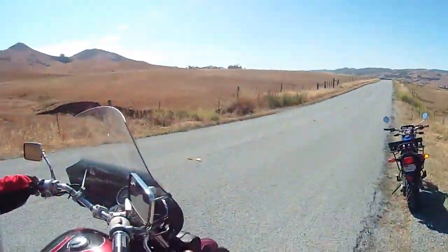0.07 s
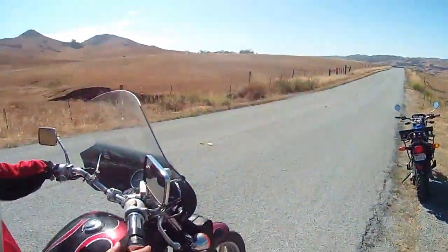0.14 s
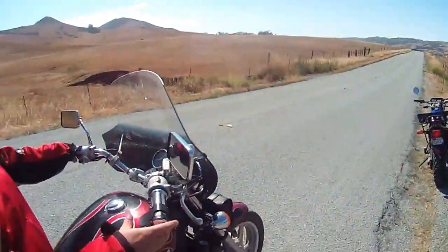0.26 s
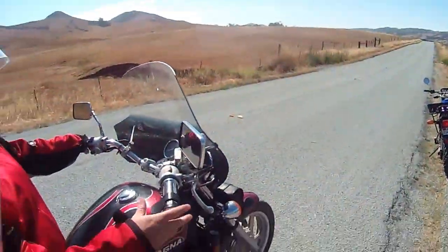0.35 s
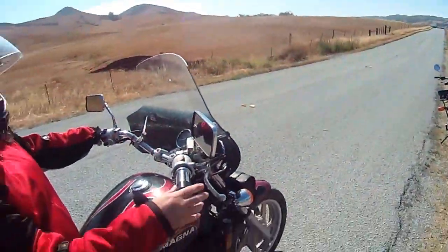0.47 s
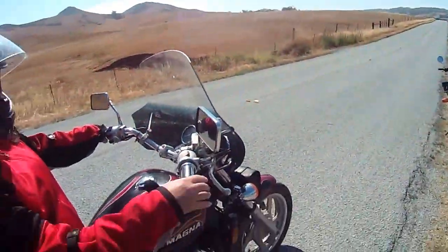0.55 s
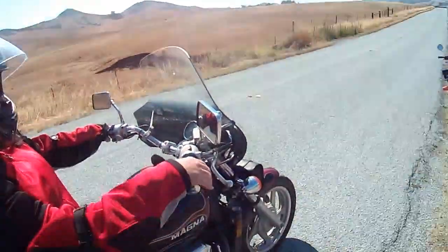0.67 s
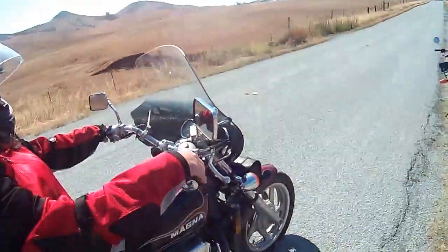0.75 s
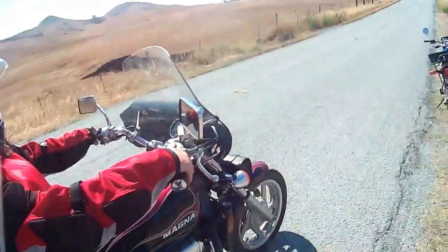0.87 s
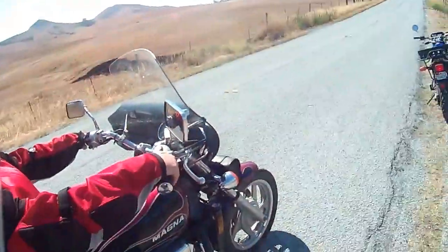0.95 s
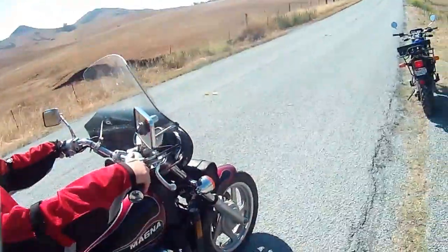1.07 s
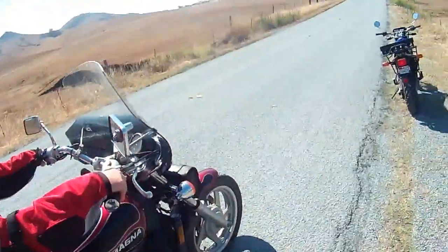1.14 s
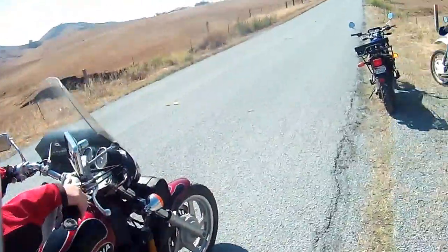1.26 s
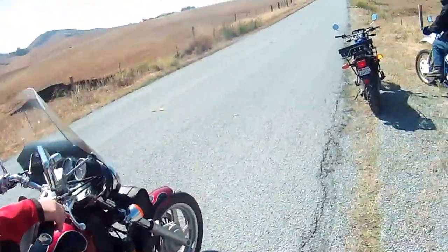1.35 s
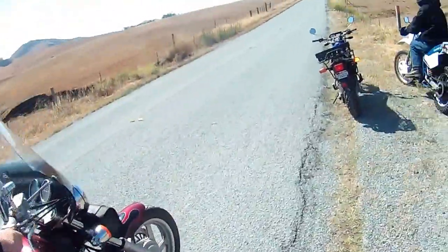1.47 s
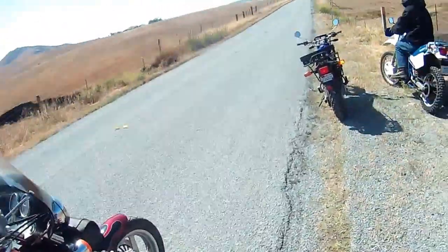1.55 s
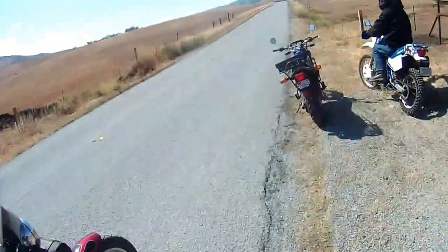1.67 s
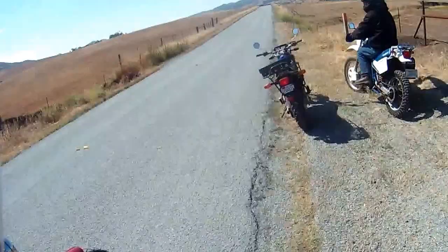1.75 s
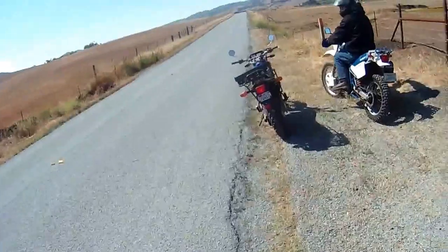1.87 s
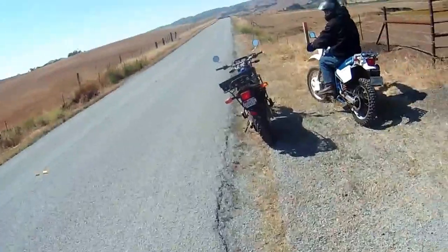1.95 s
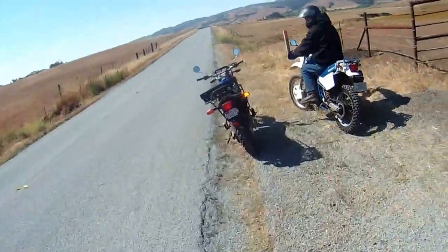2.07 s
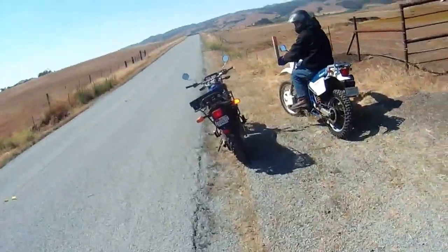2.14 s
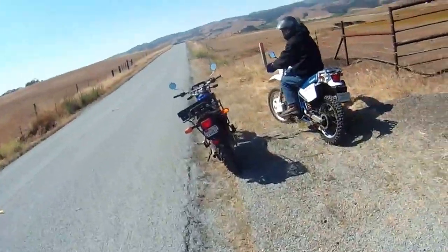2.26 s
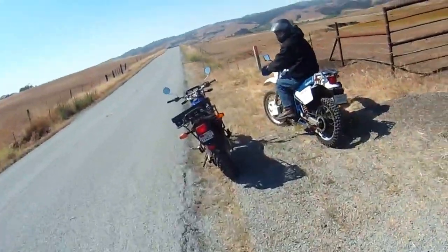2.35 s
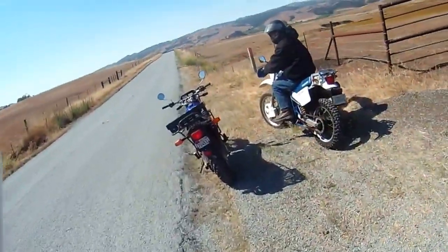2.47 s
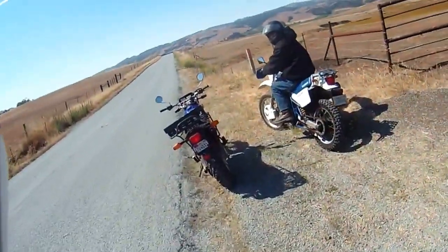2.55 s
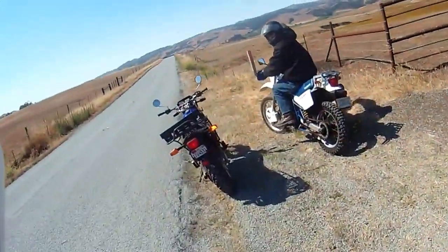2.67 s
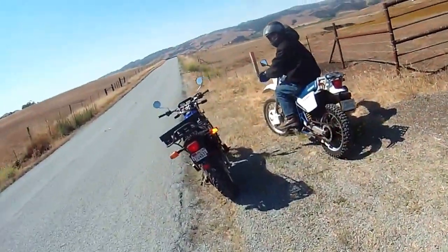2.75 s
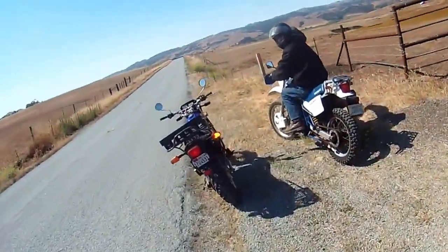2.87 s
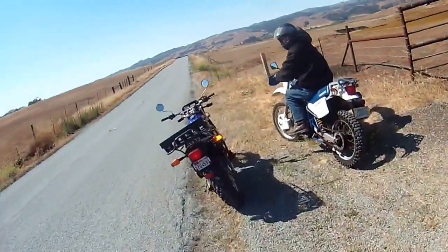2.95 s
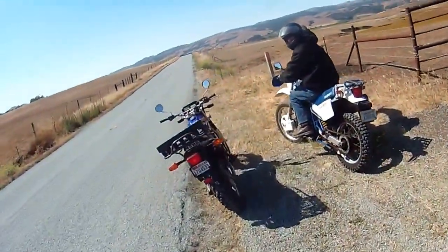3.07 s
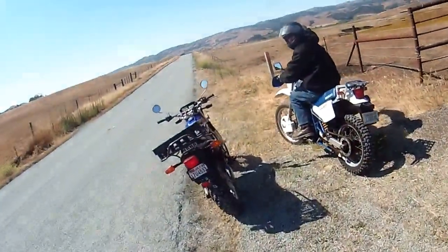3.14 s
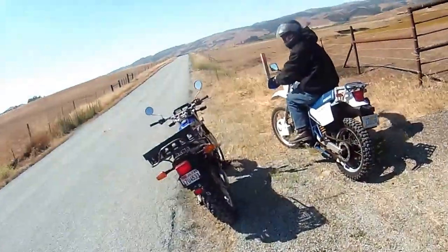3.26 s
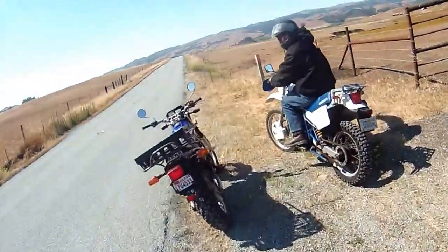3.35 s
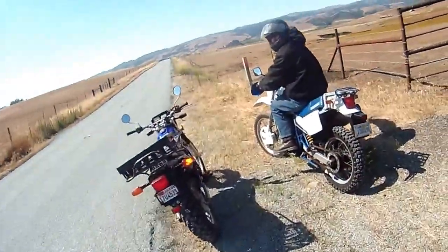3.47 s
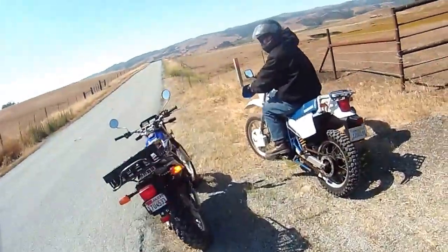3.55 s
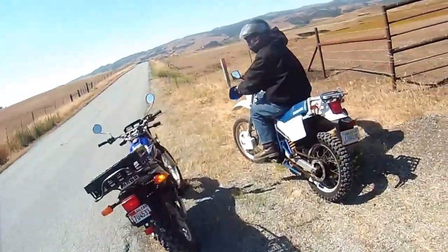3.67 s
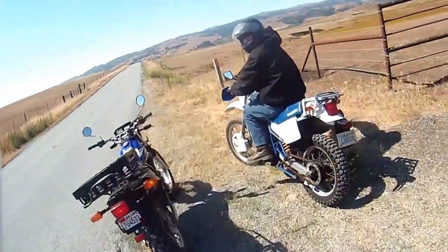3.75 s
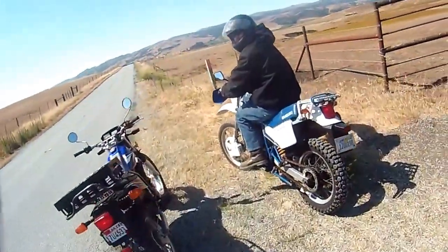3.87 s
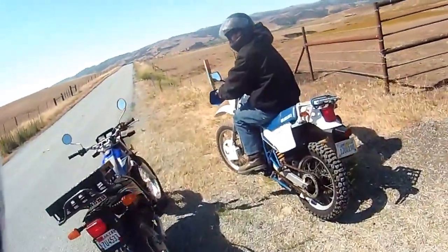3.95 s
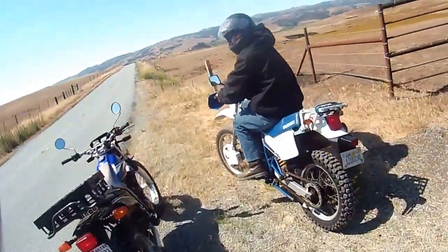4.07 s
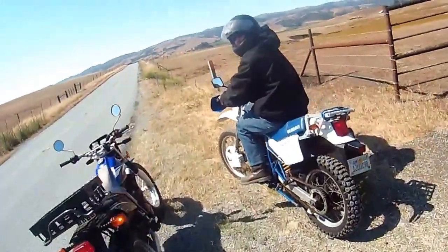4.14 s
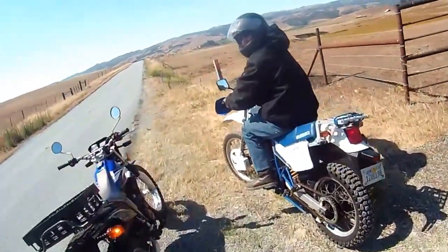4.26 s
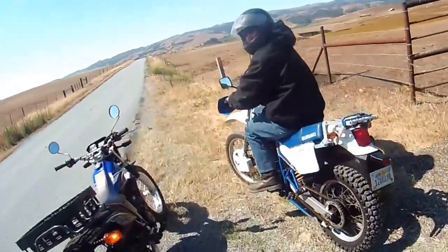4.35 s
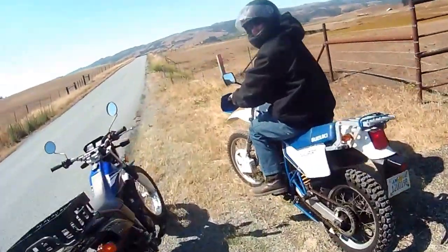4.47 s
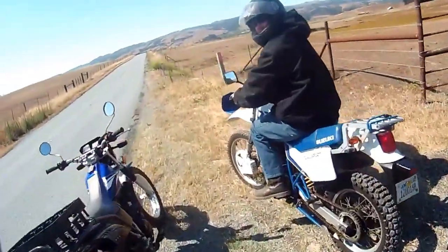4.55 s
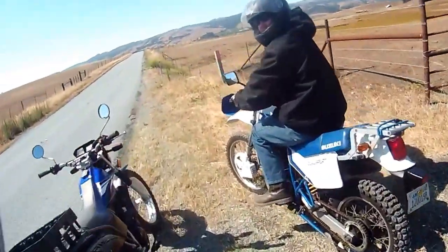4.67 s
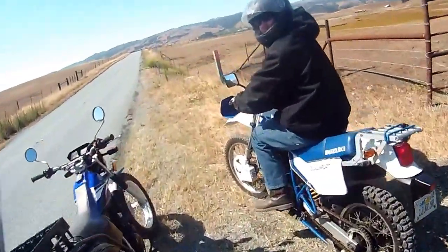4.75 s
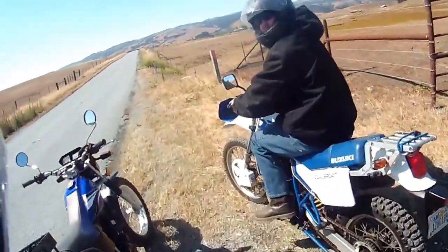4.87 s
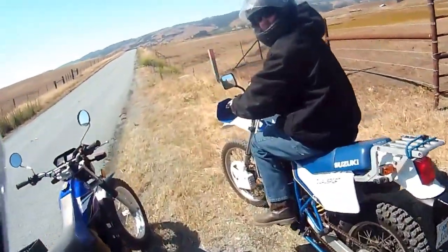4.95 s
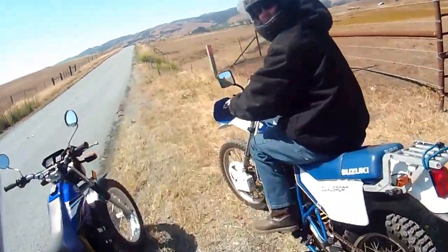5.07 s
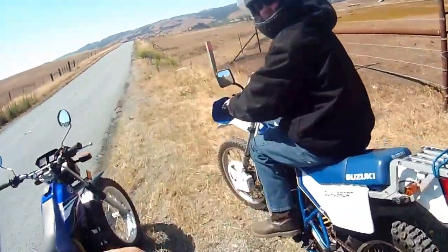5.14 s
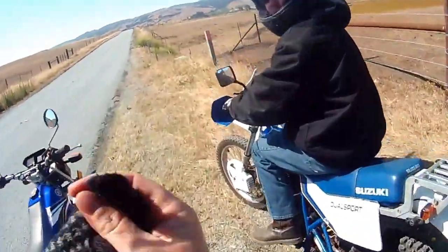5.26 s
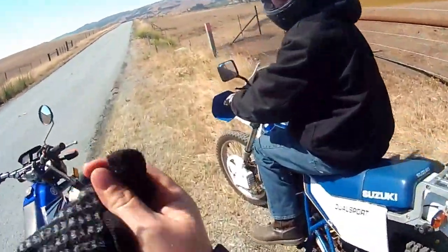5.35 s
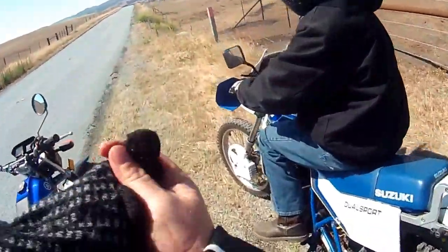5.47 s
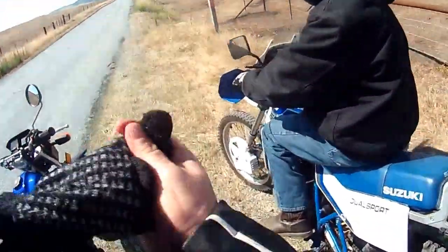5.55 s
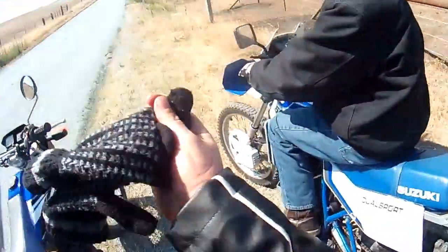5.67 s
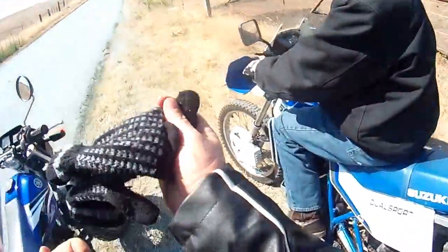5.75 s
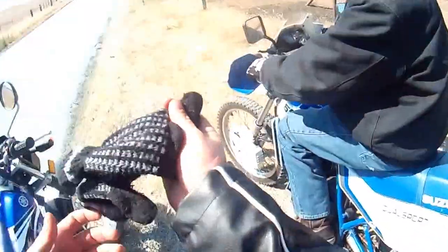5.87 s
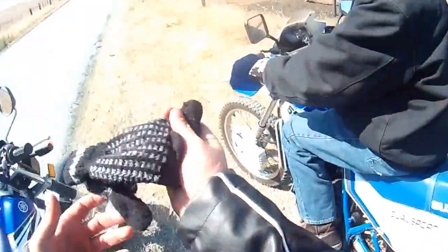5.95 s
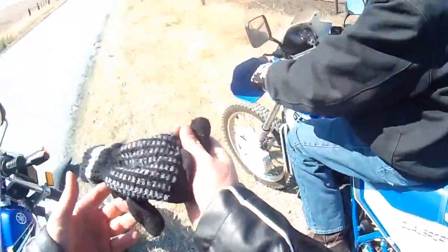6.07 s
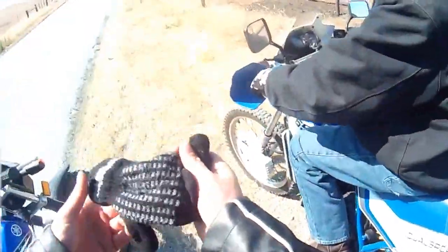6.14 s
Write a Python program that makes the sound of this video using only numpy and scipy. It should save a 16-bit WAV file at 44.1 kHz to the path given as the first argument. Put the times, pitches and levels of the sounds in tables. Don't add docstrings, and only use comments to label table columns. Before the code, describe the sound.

Outdoors on a country roadside, heard from a cased microphone on a helmet. A nearby motorcycle blips its throttle, whines at the peak, then drops and fades within a second and a half. The wearer walks on with low thumps toward two idling bikes: sharp regular valve ticks with soft muffler puffs, and a slower clatter with hisses. A strap buckle rattles once midway, and loose covers knock near the end.

```python
import sys
import numpy as np
from scipy import signal
from scipy.io import wavfile
from scipy.ndimage import uniform_filter1d

SR = 44100
rng = np.random.default_rng(int(sys.argv[2]) if len(sys.argv) > 2 else 0)


def gain_from_decibels(decibels):
    exponent = np.asarray(decibels, float) / 20
    return 10 ** exponent


def digitize_waveform(pressure):
    field = np.atleast_2d(pressure).T
    bounded = np.clip(field, -1, 1)
    quanta = np.round(bounded * 32767).astype(np.int16)
    wavfile.write(sys.argv[1], SR, quanta)


N = 273508
TIME_S = np.arange(N) / SR

# (time [s], firings so far [count])
FIRINGS = [(1.4502, 0), (2.7517, 23), (3.4272, 35), (3.5359, 37), (3.8737, 43), (3.9844, 45), (4.73, 59),
           (4.951, 63), (5.4835, 73), (5.7035, 77), (6.185, 86)]


def evened(x):
    return x / np.sqrt(np.mean(x ** 2) + 1e-20)


def read(points, hz):
    f, value = np.transpose(points)
    return np.interp(np.log(hz + 1), np.log(f + 1), value)


def follow(rows):
    s, *columns = np.transpose(rows)
    return [np.interp(TIME_S, s, column) for column in columns]


def colour(x, points):
    gain_db = read(points, abs(np.fft.fftfreq(4096, 1 / SR)))
    log_gain = np.log(gain_from_decibels(np.maximum(gain_db, -100)))
    response = np.fft.ifft(np.exp(np.conj(signal.hilbert(log_gain)))).real
    return signal.oaconvolve(x, response)[:len(x)]


def resonate(x, hz, width):
    pole = np.exp((-np.pi * width + 2j * np.pi * hz) / SR)
    return 2 * signal.lfilter([1 - abs(pole)], [1, -pole], x).real


def treble(x, above_hz):
    return signal.sosfilt(signal.butter(2, above_hz, "high", fs=SR, output="sos"), x)


def brighten(x, db, above_hz=2400):
    return x + (gain_from_decibels(db) - 1) * treble(x, above_hz)


def drift(per_s):
    knots = rng.standard_normal(int(N / SR * per_s) + 2)
    return evened(np.interp(TIME_S * per_s, np.arange(len(knots)), knots))


def add(mix, s, sound):
    part = mix[round(s * SR):][:len(sound)]
    part += sound[:len(part)]


def passing(closest_s, aside_s, closest_db, per_doubling_db):
    distance = np.hypot(1, (TIME_S - closest_s) / aside_s)
    return closest_db - per_doubling_db * np.log2(distance)


def patchy(x, broad_db, fine_db):
    z = signal.stft(x, nperseg=2048)[2]
    broad, fine = rng.standard_normal((2,) + z.shape)
    broad = evened(uniform_filter1d(uniform_filter1d(broad, 25, 0), 24, 1))
    fine = evened(uniform_filter1d(uniform_filter1d(fine, 2, 0), 10, 1))
    more_when_high = np.linspace(.3, 2.5, len(z))[:, None]
    gain = gain_from_decibels(broad_db * more_when_high * broad + fine_db * fine)
    return evened(signal.istft(z * gain, nperseg=2048)[1][:N])


def clatter(spread_db, broad_db):
    return patchy(rng.standard_normal(N), broad_db, fine_db=2.5) * gain_from_decibels(spread_db * drift(700))


def firing_pulses(count, uneven_db, gas):
    at = np.flatnonzero(np.diff(np.floor(count)) > 0)
    drive = np.zeros(N)
    drive[at] = gain_from_decibels(uneven_db * rng.standard_normal(len(at)))
    return evened(drive) + gas * rng.standard_normal(N) * np.exp(-(count % 1) / 0.61)


def burst(length_s):
    t = np.arange(1500) / SR
    return rng.standard_normal(len(t)) * np.minimum(t / 0.0017, 1) * np.exp(-t / length_s)


def exhaust_orders(hz, turns, octaves, throttle):
    # (order, full speed and shut throttle [dB], gained open [dB], lost per octave slower [dB])
    low_orders = [(2, -56, 0.5, 18), (3, -54, -26, 9), (4, -59, 1.5, 4), (5, -69, 9, -2)]
    # (order, level against the 5th [dB])
    upper_orders = [(6, -3.5), (7, -6), (8, -15)]
    # (centre [Hz], half width [Hz], lift [dB])
    pipe_boom = (196, 43, 8.4)
    boom_hz, half_hz, boom_db = pipe_boom
    lumpy_db = 0.6 - 1.5 * octaves
    orders_db = [db + open_db * throttle + fall_db * octaves + lumpy_db * drift(13.5)
                 for _, db, open_db, fall_db in low_orders]
    fifth_db = orders_db[-1]
    out = np.zeros(N)
    for k, db in enumerate(orders_db):
        out += gain_from_decibels(db) * np.cos(2 * np.pi * ((k + 2) * turns + 0.181 * k ** 2))
    crossing_db = boom_db - 20 * ((5 * hz - boom_hz) / half_hz) ** 2
    out += gain_from_decibels(fifth_db + crossing_db) * (1 - throttle) * np.cos(2 * np.pi * 5 * turns)
    for k, db in upper_orders:
        lift_db = boom_db * np.exp(-((k * hz - boom_hz) / half_hz) ** 2) - 7.0
        order_db = fifth_db + db + lumpy_db * drift(14.0) + (1.5 - throttle) * lift_db
        out += gain_from_decibels(order_db) * np.cos(2 * np.pi * k * turns)
    return out


def gear_whine(hz, turns, throttle):
    # (order, level [dB])
    whine_orders = [(12, -20), (14, -19), (16, -22), (19, -27), (28.5, -6), (37.9, 5), (43, 3), (50, -8)]
    steep_db_per_hz = 3 + (5.5 - 3) * throttle
    whine_db = -55.5 + steep_db_per_hz * np.minimum(hz - 42.6, 0)
    out = np.zeros(N)
    for k, db in whine_orders:
        unloaded_db = 10.0 * (k < 20) * np.clip((TIME_S - .33) / .05, 0, 1)
        out += gain_from_decibels(whine_db + db + 1.6 * drift(44.4) - unloaded_db) * np.cos(2 * np.pi * k * turns)
    return out


def pipe_gas(octaves, throttle, throb_db):
    # (frequency [Hz], density [dB per Hz])
    gas_tone = [(40, -20), (120, 0.5), (200, -1), (370, -9.5), (480, -15), (800, -33)]
    # (pitch [Hz], width [Hz], level [dB], fading time [s])
    frame_hum = (754, 17, -78, 0.34)
    hum_hz, hum_width_hz, hum_db, hum_s = frame_hum
    rush = gain_from_decibels(-69 + throb_db) * evened(colour(rng.standard_normal(N), gas_tone))
    note = gain_from_decibels(-67.5 + 2.0 * octaves - 16 * throttle) * evened(resonate(rng.standard_normal(N), 196, 25))
    hum_level = gain_from_decibels(hum_db - 20 * (TIME_S / hum_s) ** 4 / 3)
    return rush + note + hum_level * evened(resonate(rng.standard_normal(N), hum_hz, hum_width_hz))


def engine_clatter(octaves, throttle, throb_db):
    # (frequency [Hz], density [dB per Hz])
    near_tone = [(260, -57.5), (450, -41.5), (499, -29), (814, -25.5), (1270, -2.5), (1470, -1.5),
                 (1660, 4.5), (2620, -9.5), (3040, -9), (3970, -19.5), (4340, -19), (5840, -24.5),
                 (6580, -21.5), (7630, -28.5), (9500, -29.5), (11000, -36.5), (15500, -38.5)]
    lag_s, leaving_s, leaving_db_per_s = 0.035, 1.39, 9
    level_db = -42 + 9.5 * np.interp(TIME_S - lag_s, TIME_S, octaves) + 0.5 * throttle
    level_db += 1.0 * np.exp(-((TIME_S - .34) / .13) ** 2)
    level_db -= leaving_db_per_s * np.clip(TIME_S - leaving_s, 0, 3)
    bright_db = 4.5 - 2.5 * np.minimum(TIME_S, 1.4)
    knocks = clatter(spread_db=0.3, broad_db=0.0) * gain_from_decibels(throb_db)
    return gain_from_decibels(level_db) * brighten(evened(colour(knocks, near_tone)), bright_db)


def blipped_engine():
    # (time [s], firing rate [Hz])
    blip_curve = [
        (0, 36.4),
        (.1, 39.2),
        (.2, 43),
        (.3, 45.5),
        (.46, 42),
        (.7, 35),
        (.95, 27.5),
        (1.2, 21.3),
        (1.45, 17),
    ]
    full_speed_hz, throttle_shut_s, shutting_s = 45, 0.3, 0.039
    hz = follow(blip_curve)[0]
    turns = np.cumsum(hz) / SR
    octaves = np.log2(hz / full_speed_hz)
    throttle = np.clip((throttle_shut_s - TIME_S) / shutting_s + .5, 0, 1)
    alive = np.clip((1.35 - TIME_S) / 0.4, 0, 1)
    throb_db = 1.2 * np.cos(2 * np.pi * turns) + .7 * np.cos(2 * np.pi * (2 * turns + .3))
    tonal = exhaust_orders(hz, turns, octaves, throttle) + gear_whine(hz, turns, throttle)
    gas = pipe_gas(octaves, throttle, throb_db)
    return np.sqrt(2) * alive * (tonal + gas) + engine_clatter(octaves, throttle, throb_db)


def tick_rows():
    # (time [s], crack [dB], knock [dB], knock pitch [Hz])
    hard_ticks = [(1.451, -56, -38, 1650), (1.564, -44, -36.5, 1660), (1.6203, -63, -55, 1700),
                  (1.679, -46.5, -40, 1680), (1.7335, -46, -40.5, 1660), (1.789, -45, -40, 1670),
                  (1.8451, -47.5, -43.5, 1640), (1.956, -48, -55, 1900), (2.0708, -42, -61, 1850),
                  (2.127, -48.5, -64, 1700), (2.186, -48.5, -61, 1700), (2.2421, -49, -47, 1530),
                  (2.299, -45, -63, 1790), (2.357, -49, -52, 1680), (2.413, -45, -44, 2570),
                  (2.4687, -45, -45.5, 2500), (2.5256, -45.5, -62, 1650), (2.5835, -43.5, -50, 1740),
                  (2.6405, -45, -67, 1680), (2.694, -46.5, -54, 1710), (2.752, -43.5, -53, 1930),
                  (2.8068, -42, -46, 1890), (2.862, -43, -45, 1700), (2.976, -39, -47, 1600),
                  (3.034, -45, -61, 1690), (3.089, -39.5, -42, 1820), (3.1453, -40, -56, 1570),
                  (3.201, -41, -63, 1670), (3.533, -44.5, -45, 1720), (3.591, -49, -48, 1700),
                  (3.649, -45.5, -52, 1700), (3.759, -43.5, -52, 1680), (3.7034, -42.5, -38, 1470),
                  (3.8736, -44.5, -38.5, 1670), (3.9835, -40.5, -37, 1570), (4.0378, -42, -42, 1560),
                  (4.0895, -37.5, -63, 1640), (4.197, -39.5, -45, 1530), (4.304, -36, -46, 1770),
                  (4.357, -42.5, -43, 1700), (4.411, -38.5, -38, 1530), (4.464, -40, -38.5, 1770),
                  (4.5179, -40.5, -42.5, 1710), (4.623, -42, -46, 1730), (4.732, -55, -52, 1700),
                  (4.784, -55, -38, 1830), (4.8943, -44.5, -38.5, 1780), (5.002, -46, -40, 1740),
                  (5.115, -45, -42, 1700), (5.598, -58, -31, 1745)]
    hard_treble_db = [-11, -11, -11, -5, -7, -5, -6, -9, -11, -8, -8, -6, -12, -8, -6, -9, -8, -15, -11, -9,
                      -14, -9, -9, 1, -5, -6, -7, -9, 4, 0, 3, -1, 1, -4, 0, -1, 2, -1, -11, -3, -1, -1, 2,
                      0, -3, 9, 2, -3, -3, -3]
    ticking_count, shaded_s, shaded_db_per_s = 77, 4.6, 40
    s, count = np.transpose(FIRINGS)
    k = np.arange(ticking_count)
    crack_chance, knock_chance, pitch_chance = rng.standard_normal((3, ticking_count))
    at = np.interp(k, count, s)
    valve_db = passing(closest_s=-1, aside_s=-7, closest_db=-53, per_doubling_db=1.5)
    crack_db = valve_db[(at * SR).astype(int)] - shaded_db_per_s * np.maximum(at - shaded_s, 0)
    crack_db += 1.5 * crack_chance + 4.5 * (-1) ** k
    knock_db = crack_db - 12 + 4 * knock_chance
    knock_hz = 1680 * (1 + 0.1 * pitch_chance)
    rows = np.transpose([at, crack_db, knock_db, knock_hz, np.zeros(ticking_count)])
    for row, treble_db in zip(hard_ticks, hard_treble_db):
        rows[np.argmin(abs(at - row[0]))] = (*row, treble_db)
    return rows


def valve_ticks():
    # (frequency [Hz], level [dB])
    tick_tone = [(400, -67), (1000, -5), (1500, -5), (2200, -0.5), (2900, -1), (3600, -9), (4000, -6.5),
                 (4600, -14), (6000, -21), (9000, -19.5), (15000, -42)]
    # (pitch [Hz], decay [s], level against the crack [dB])
    tick_ring = (3100, 0.0039, -13.5)
    ring_hz, ring_s, ring_db = tick_ring
    out, t = np.zeros(N), np.arange(1500) / SR
    for s, crack_db, db, hz, treble_db in tick_rows():
        knock = np.exp(-((t - .0016) / 0.0013) ** 2) * np.cos(2 * np.pi * (hz * t + rng.random()))
        click = 2.8 * (np.arange(1500) == 30)
        crack = colour(click + burst(length_s=0.0015) + 0.2 * burst(length_s=0.012), tick_tone)
        crack = brighten(crack, treble_db, above_hz=4800)
        ring = np.exp(-t / ring_s) * np.sin(2 * np.pi * ring_hz * rng.uniform(0.71, 1.07) * t)
        tick = gain_from_decibels(crack_db + ring_db) * ring + gain_from_decibels(db - 2.5) * knock
        tick = tick + gain_from_decibels(crack_db - 10) * crack / np.std(crack[:130])
        echo = np.roll(tick, 400)
        add(out, s, tick + 0.46 * echo * rng.uniform(0.71, 0.79))
    return out


def muffler_puffs():
    # (pitch [Hz], width [Hz], level [dB])
    muffler_modes = [(69, 97, 0), (131.7, 12, -2.5), (190, 20, -21), (251.5, 42, 4), (337, 38, -16),
                     (503, 760, -18)]
    count = follow(FIRINGS)[0] + 0.042
    drive = firing_pulses(count, uneven_db=1.3, gas=0.42)
    drive = drive * gain_from_decibels(-0.8 * np.cos(np.pi * np.floor(count)))
    out = np.zeros(N)
    for k, (hz, width, db) in enumerate(muffler_modes):
        mode = resonate(resonate(drive, hz, 2.0 * width), hz, width)
        out += (-1) ** k * gain_from_decibels(db) * evened(mode)
    return gain_from_decibels(passing(closest_s=5.5, aside_s=1.31, closest_db=-59.5, per_doubling_db=13.5)) * evened(out)


def slow_pipe(strokes):
    beat = firing_pulses(strokes + .22 + .03 * drift(5), uneven_db=1.2, gas=.6)
    pipe = resonate(resonate(beat, 354, 66), 369.4, 14.8)
    pipe += 0.15 * resonate(resonate(beat, 464, 130), 485, 42)
    pipe += 0.1 * resonate(resonate(beat, 593, 120), 653, 55)
    return gain_from_decibels(passing(closest_s=5, aside_s=2.5, closest_db=-67, per_doubling_db=10)) * evened(pipe)


def slow_valve():
    # (time [s], peak level [dB])
    chuffs = [(2.2837, -64), (2.3464, -68), (2.5386, -65), (2.602, -63), (2.6644, -65), (2.7257, -66),
              (2.7901, -64), (2.8519, -63), (2.9138, -63), (3.0375, -62), (3.4057, -60), (3.4645, -61),
              (3.7898, -61), (3.916, -59), (4.1515, -58), (4.2253, -58), (4.2872, -57), (4.351, -62),
              (4.6094, -60), (4.6623, -63), (4.7267, -60), (4.8479, -61), (4.9881, -60), (5.0499, -62),
              (5.1114, -57), (5.1677, -54), (5.2345, -55), (5.3023, -56), (5.3567, -60), (5.4244, -61),
              (5.4874, -61), (5.5494, -59), (5.6144, -59), (5.6774, -60), (5.7394, -64), (5.802, -63),
              (5.8561, -63), (5.9194, -58), (5.9894, -65), (6.0494, -66), (6.1624, -60)]
    # (frequency [Hz], level [dB])
    chuff_tone = [(3000, -27), (4700, 4), (5900, -8), (7600, 3.5), (9000, -5), (11500, -5), (14000, -12),
                  (15500, -25)]
    # (time [s], peak level [dB], pitch [Hz])
    cover_knocks = [(4.6069, -46, 1670), (4.676, -42, 1740), (4.8683, -45, 1820), (4.9808, -37, 1690),
                    (5.0474, -35, 1610), (5.1593, -41, 1530), (5.1831, -49, 1540), (5.304, -34, 1880),
                    (5.4056, -43, 1670), (5.4655, -41, 1730), (5.5662, -41, 1850), (5.674, -38, 1850),
                    (5.6905, -39, 2000), (5.8, -54, 1740), (5.9367, -36.5, 1730), (5.9984, -43, 1770),
                    (6.1227, -42, 1670)]
    drive, out, t = np.zeros(N), np.zeros(N), np.arange(2000) / SR
    for s, db in chuffs:
        add(drive, s, gain_from_decibels(db + 2) * burst(length_s=0.0072))
    shape = np.minimum(t / 0.0012, 1) * np.exp(-t / 0.0073)
    for s, db, hz in cover_knocks:
        add(out, s, gain_from_decibels(db - 4) * shape * np.sin(2 * np.pi * (hz * t + rng.random())))
    return out + colour(drive, chuff_tone)


def ringing_covers():
    # (pitch [Hz], width [Hz], level [dB], time of its swell or dip [s], gained then,
    # dip if negative [dB])
    covers = [(1540, 6.7, -5.5, 5.2, -2), (1677, 10, -6, 5.04, 6), (1708, 10, -6, 5.57, 2),
              (1790, 14, -9, 5.6, 6), (1859, 13, -9.5, 5.3, 8), (1958, 15, -7, 5.5, 3.5),
              (2117, 24, -21, 5.6, -3), (2763, 18, -23, 4, -2), (2907, 24, -19.5, 3.9, 2.5),
              (3220, 9.4, -33, 3.2, 2.5),
              (5000, 43, -32, 2.2, 6), (8230, 84, -37, 2.6, 11), (10400, 180, -39, 2.5, 11),
              (6540, 90, -30, 1.7, 22), (2560, 88, -20.5, 2.9, 13), (4395, 92, -25.5, 3.75, 11),
              (5300, 51, -31.5, 5.35, 12), (8930, 81, -42, 5.3, -2), (1313, 28, -18, 5.5, -8),
              (11200, 150, -49, 5.1, 4)]
    shaking = rng.standard_normal(N)
    out = np.zeros(N)
    for hz, width, db, s, gain_db in covers:
        near_db = gain_db * np.exp(-((TIME_S - s) / 0.23) ** 2)
        out += gain_from_decibels(db + drift(6.2) + near_db) * evened(resonate(shaking, hz, width))
    song = np.cos(2 * np.pi * np.cumsum(1522 + 4 * drift(12)) / SR)
    song_db = -2.5 + 1.8 * drift(25) + 5.5 * np.exp(-((TIME_S - 5.23) / 0.11) ** 2)
    return out + gain_from_decibels(song_db) * np.clip((TIME_S - 5.13) / 0.046, 0, 1) * song


def idlers_clatter(strokes):
    # (time [s], clatter level [dB], treble gained as the head turns [dB])
    approach = [(1.4, -74, 8), (1.7, -68.5, 3), (2.1, -65.5, 5.5), (2.5, -64.5, -3.5), (3.2, -60, -1.5),
                (3.6, -59, 1), (4.1, -58, 1), (4.5, -56.5, 2), (4.8, -56.5, -0.5), (5.3, -57.5, 1.5),
                (5.7, -56, -0.5), (6.2, -57, 1.5)]
    # (frequency [Hz], density [dB per Hz])
    far_tone = [(260, -62), (450, -21.5), (633, -24), (790, -28.5), (1200, -11), (1470, -9), (1510, -4),
                (1730, -0.2), (1990, -7), (2060, -14.5), (2260, -10.5), (3090, -16.5), (3970, -31),
                (4680, -19.5), (5840, -35), (7630, -22), (12000, -45.5), (15500, -55)]
    # (pitch [Hz], width [Hz], level [dB], fading from [s], lost [dB per s])
    side_ring = (2971, 228, -7, 2.5, 9)
    close_db, facing_s = -56, 4.94
    level_db, bright_db = follow(approach)
    knocks = clatter(spread_db=2.5, broad_db=1.8) * gain_from_decibels(0.21 * drift(25))
    body = evened(colour(knocks, far_tone))
    top = treble(treble(body[::-1], 10500)[::-1], 10500)
    body = body - 0.71 * np.clip((TIME_S - facing_s) / 0.5, 0, 1) * top
    depth_db = 4.5 * np.exp(-((TIME_S - 5) / 0.84) ** 2)
    hiss_db = bright_db + depth_db * np.cos(2 * np.pi * strokes)
    fin_hz, fin_width, fin_db, fading_s, lost_db = side_ring
    fins = evened(resonate(resonate(knocks, fin_hz, fin_width), fin_hz, fin_width))
    fins = gain_from_decibels(fin_db - lost_db * np.maximum(TIME_S - fading_s, 0)) * fins
    ring_db = -3.5 - 0.1 * (level_db - close_db) + 3.5 * np.clip((TIME_S - facing_s) / 0.088 + .5, 0, 1)
    arrival_db = -15 * np.clip(1.4 - TIME_S, 0, 1)
    return gain_from_decibels(level_db + arrival_db) * (brighten(body, hiss_db) + fins + gain_from_decibels(ring_db) * ringing_covers())


def idling_bikes():
    strokes = 15.873 * (TIME_S - 2.029)
    coming_in = np.clip(TIME_S / 0.277 - 4, 0, 1)
    puffs = (muffler_puffs() + slow_pipe(strokes)) * coming_in
    return idlers_clatter(strokes) + puffs + valve_ticks() + slow_valve()


def helmet_steps():
    # (time [s], peak level [dB], pitch [Hz], length [s])
    bumps = [(0.205, -49, 164, 0.0102), (0.335, -47, 150, 0.005), (2.1, -50, 92, 0.006),
             (3.4, -59, 100, 0.012), (4.9, -55, 95, 0.0174), (3.1, -49, 62, 0.012), (2.8, -53, 115, 0.01),
             (3.98, -49, 236, 0.0055), (1.02, -51, 55, 0.028), (0.843, -50, 92, 0.0165),
             (0.78, -51, 100, 0.0164), (1.186, -46.5, 170, 0.0039), (1.39, -51, 138, 0.0122),
             (5.046, -56, 66, 0.0099), (8.3, -52, 80, 0.011), (2.585, -52, 65, 0.0286),
             (2.706, -41, 230, 0.0021), (2.773, -43.5, 190, 0.0014), (2.974, -58, 340, 0.0031),
             (4.9, -53, 120, 0.008), (3.346, -52.5, 300, 0.0042), (3.962, -45, 230, 0.003),
             (4.3, -50, 76, 0.013), (4.089, -55, 100, 0.0133), (5.4, -55, 74.5, 0.0092),
             (3.2, -54, 115, 0.011), (5.7, -54, 127, 0.0182), (7.1, -55, 85, 0.021),
             (6.11, -54, 240, 0.0057), (4.8, -62, 71, 0.023), (5, -47, 340, 0.004),
             (5.551, -49, 130, 0.0032), (5.561, -54, 75, 0.036), (5.71, -51, 58, 0.011)]
    out = np.zeros(N)
    for s, db, hz, length in bumps:
        u = np.arange(round(6 * length * SR)) / SR / length
        swell = np.e * u * np.exp(-u)
        add(out, s - length, gain_from_decibels(db) * swell * -np.cos(2 * np.pi * hz * length * u * (1 - 0.025 * u)))
    return out


def strap_rattle():
    # (time [s], peak level [dB], treble [dB])
    rattle_knocks = [(3.257, -66, -2), (3.278, -54, 4), (3.296, -49, 2), (3.305, -54, -2),
                     (3.3147, -44.5, 4), (3.33, -44.5, 5.5), (3.3434, -43, 8), (3.350, -51, 1),
                     (3.357, -44, 1), (3.368, -43, -7), (3.374, -47, -9), (3.385, -50, 1), (3.394, -54, -3),
                     (3.405, -59, 5), (3.418, -53, -5), (3.426, -45.5, 1), (3.491, -48, -1)]
    # (frequency [Hz], level [dB])
    strap_tone = [(700, -21.5), (1300, -3), (1750, 2), (2600, -7.5), (3800, -18), (4500, -7.5), (5300, -22),
                  (7500, -18), (9500, -29), (15000, -28)]
    # (frequency [Hz], level [dB])
    scrape_tone = [(700, -21), (1300, 6.5), (1750, 2), (2600, -1), (4000, -5), (4600, -7), (7500, -26),
                   (12000, -18), (15000, -18)]
    scrape = gain_from_decibels(-51.5 + 3.2 * drift(150)) * rng.standard_normal(N) * np.exp(-((TIME_S - 3.40) / 0.078) ** 2)
    drive = np.zeros(N)
    for s, db, treble_db in rattle_knocks:
        add(drive, s, gain_from_decibels(db + 13.0) * brighten(burst(length_s=0.0037), treble_db))
    return colour(drive, strap_tone) + colour(scrape, scrape_tone)


def rumble():
    # (frequency [Hz], density [dB per Hz])
    rumble_tone = [(12, -28), (22, -9), (40, -3), (55, 1.5), (70, 0), (140, 0), (192, -4), (268, -15),
                   (400, -17), (520, -18.5), (900, -34.5), (1170, -61.5)]
    pace_s, footfall_s, firing_lag = 0.7, 1.98, 0.17
    level_db = -58.5 - (TIME_S - 1.1) + 0.5 * np.cos(2 * np.pi * (TIME_S - footfall_s) / pace_s)
    throb = np.cos(2 * np.pi * (follow(FIRINGS)[0] - firing_lag))
    level_db += 3.5 * np.clip(TIME_S - 1.5, 0, 1) * throb
    level_db += 0.7 * drift(20) - 4 * np.clip(1.1 - TIME_S, 0, 1)
    return gain_from_decibels(level_db) * evened(colour(rng.standard_normal(N), rumble_tone))


def scene():
    mix = blipped_engine() + idling_bikes() + helmet_steps() + strap_rattle() + rumble()
    return np.array([mix, mix])


def circuit_whine():
    # (frequency [Hz], level [dB])
    circuit_tones = [(15058.5, -110), (15116.6, -99), (15174.5, -93), (15232.5, -105), (15290.4, -104)]
    return sum(gain_from_decibels(db) * np.sqrt(2) * np.sin(2 * np.pi * hz * TIME_S) for hz, db in circuit_tones)


def drop_faint_treble(x, floor_db, above_hz):
    hz, _, z = signal.stft(x, SR, nperseg=2048, noverlap=1024)
    bands = (abs(z[:1024]) ** 2).reshape(128, 8, -1).sum(1)
    band_db, moment_db = 3 * rng.standard_normal(bands.shape), 3 * rng.standard_normal(bands.shape[1])
    limit = gain_from_decibels(floor_db + band_db + moment_db) ** 2
    faint = np.repeat(bands < limit, 8, axis=0) & (hz[:1024, None] > above_hz)
    z[:1024] *= 1 - .97 * faint
    return signal.istft(z, SR, nperseg=2048, noverlap=1024)[1][:N]


def channel_splits():
    # (time [s], low edge [Hz], high edge [Hz], level [dB])
    split_bands = [
        (0.417, 4270, 5000, -62),
        (.418, 7500, 9000, -72),
        (.604, 4600, 5750, -63),
        (.604, 6250, 9000, -70),
        (.766, 5300, 7350, -67.5),
    ]
    side = np.zeros(N)
    for s, low_hz, high_hz, db in split_bands:
        band = signal.butter(6, [low_hz, high_hz], "band", fs=SR, output="sos")
        noise = signal.sosfilt(band, rng.standard_normal(2048))
        add(side, s - .015, gain_from_decibels(db) * evened(noise) * np.hanning(2048))
    return np.array([side, -side])


def roll_off(x):
    return signal.sosfilt(signal.butter(12, 15690, fs=SR, output="sos"), x)


def record(dry):
    # (frequency [Hz], gain [dB])
    microphone_tone = [(20, 4), (48, -5.5), (65, -1), (3750, -0.5), (3980, -5), (4250, 3), (9000, -3.5),
                       (11500, -7), (13500, -8), (14500, -15), (15700, -1)]
    hiss = gain_from_decibels(-84.5) * rng.standard_normal(N)
    heard = colour(dry[0], microphone_tone) + hiss + circuit_whine()
    heard = drop_faint_treble(heard, floor_db=-103.5, above_hz=12000)
    return roll_off(heard + channel_splits())


dry = scene()
out = record(dry)
digitize_waveform(out)
```